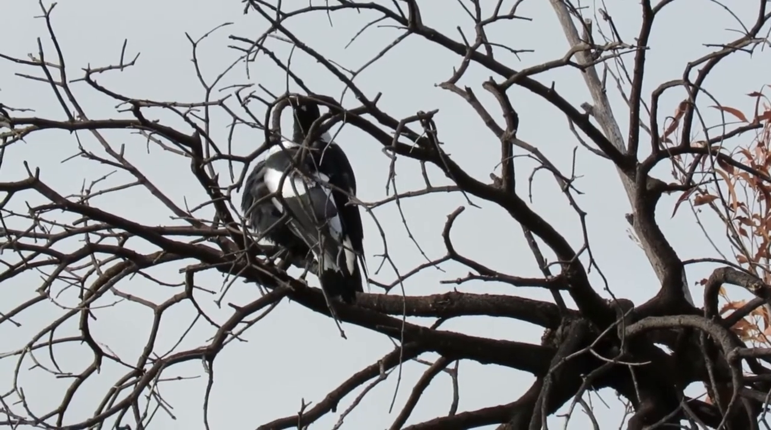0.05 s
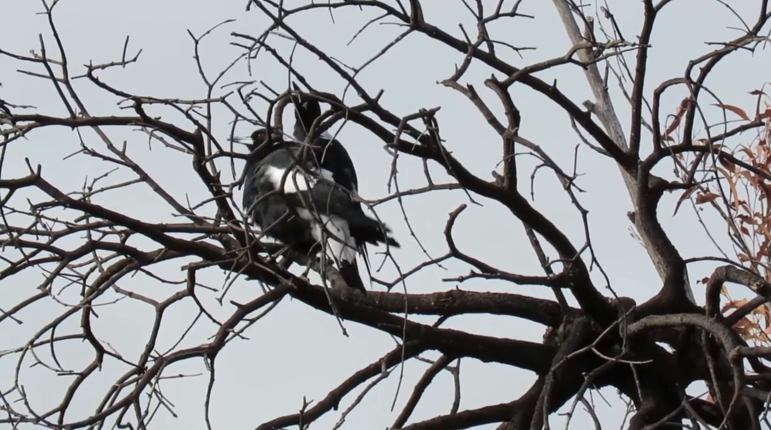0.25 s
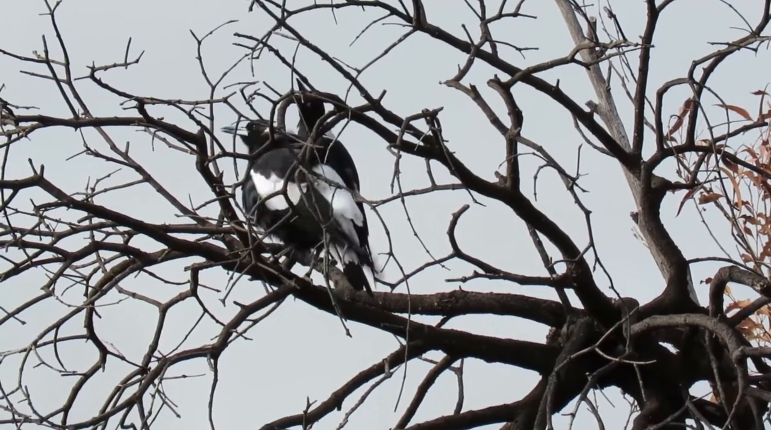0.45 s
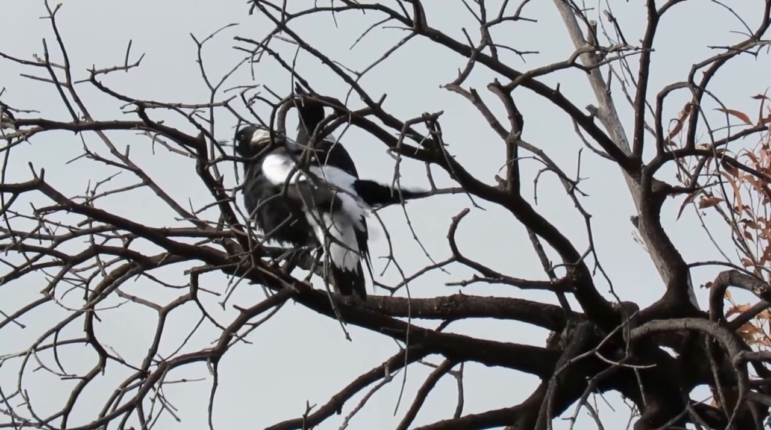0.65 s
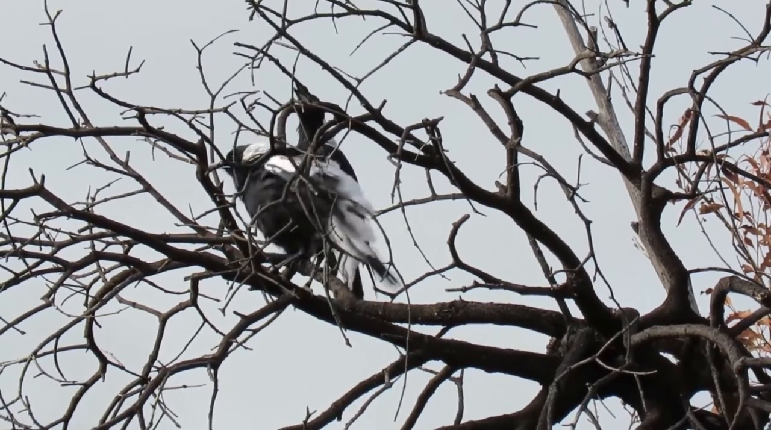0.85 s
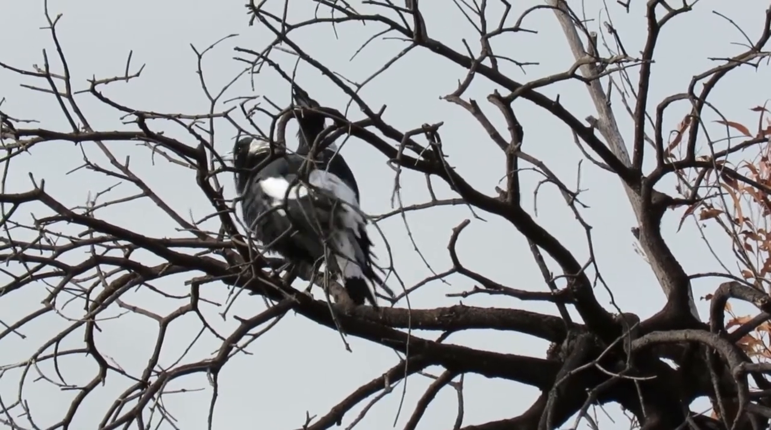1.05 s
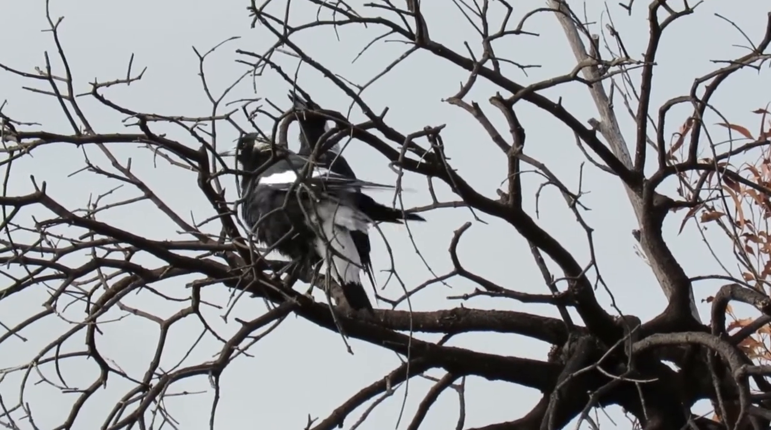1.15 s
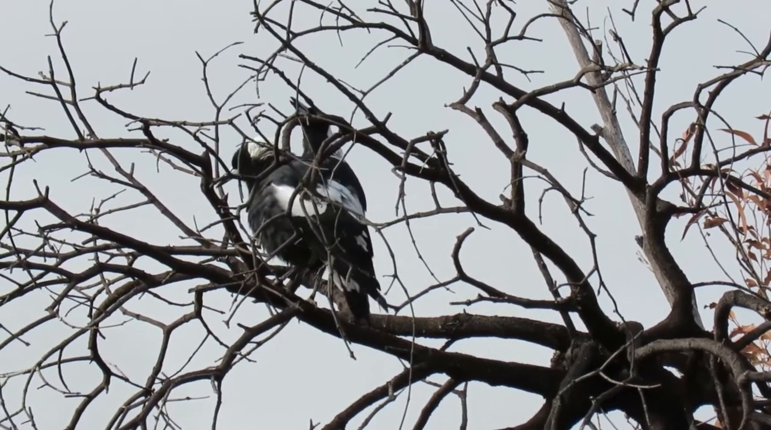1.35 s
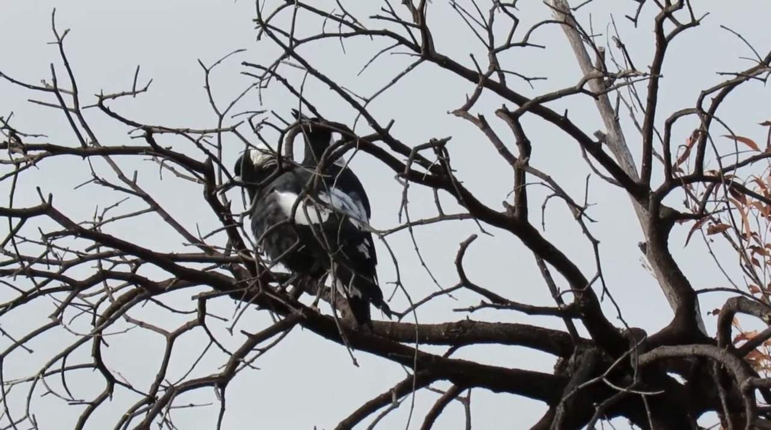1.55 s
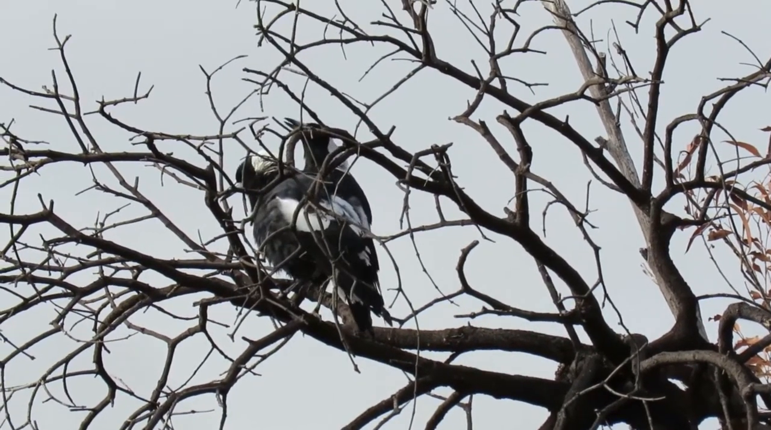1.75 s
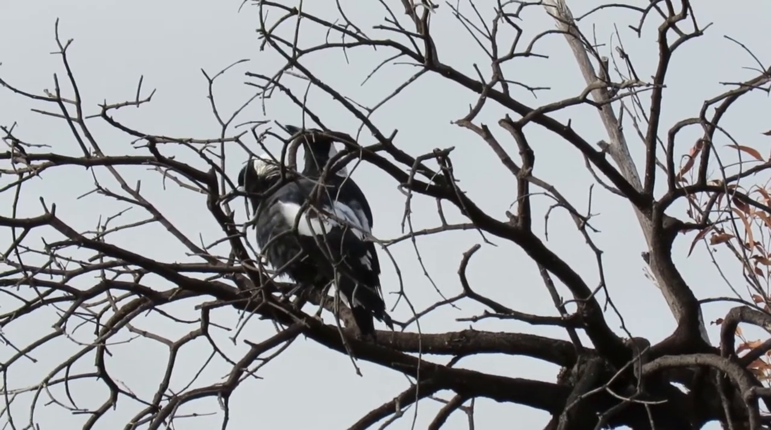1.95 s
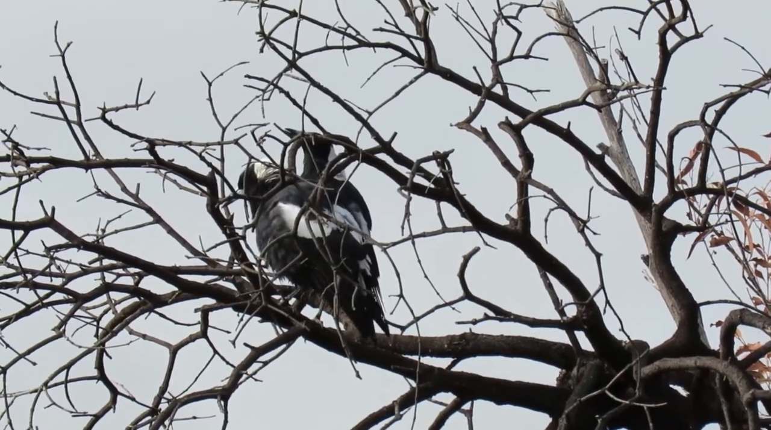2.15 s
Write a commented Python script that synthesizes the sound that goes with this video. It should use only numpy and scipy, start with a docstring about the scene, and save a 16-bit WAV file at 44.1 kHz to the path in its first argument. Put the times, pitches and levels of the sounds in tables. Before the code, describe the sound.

Close magpie call: piercing downward cry breaking reedy, mellow fluting and purring over quiet outdoor hush

```python
"""A far bird's fluttering notes sound now and then under a steady hush; a near magpie opens with soft
notes and rasps. A loud falling call breaks into a short reedy note; a fluted whistle, a low purr and a
closing chuckle follow. The bird is two oscillators, the sides of its syrinx, which beat, chop each other
and make mixed tones. The air is shaped noise, the wind shaped noise in gusts; delayed copies and a
decaying noise tail give echoes."""
import sys
import numpy as np
from scipy import signal
from scipy.fft import rfft, irfft
from scipy.io import wavfile
from scipy.ndimage import uniform_filter1d

SR = 44100
rng = np.random.default_rng(int(sys.argv[2]) if len(sys.argv) > 2 else 0)


def to_wav(sig):
    """Store sig (one row per channel, or 1-D mono) as 16-bit WAV at the path in sys.argv[1].

    Samples outside -1..1 are clipped; the rate is SR.
    """
    pcm = np.clip(np.atleast_2d(sig), -1, 1) * 32767
    pcm = np.round(pcm).astype(np.int16)
    wavfile.write(sys.argv[1], SR, pcm.T)  # frames by channels


N = 97020
T = np.arange(N) / SR  # s
SPECTRUM_HZ = np.arange(N // 2 + 1) * SR / N


def from_db(db):
    """Logarithmic level: decibels to amplitude gain."""
    return 10 ** (np.asarray(db) / 20)


def rms_one(x):
    """Power normalization: scale to rms 1."""
    return x / np.sqrt(np.mean(x ** 2) + 1e-20)


def in_time(rows):
    """Linear interpolation: each column of a curve at every sample."""
    s, *columns = np.transpose(rows)
    return [np.interp(T, s, column) for column in columns]


def at_hz(points, hz):
    """Logarithmic frequency axis: read a spectrum between its points."""
    f, value = np.transpose(points)
    return np.interp(np.log(hz + 1e-9), np.log(f), value)


def drift(hz):
    """Low-pass filtered chance: random variation slower than about hz, with rms 1."""
    lowpass = 1 / (1 + ((SPECTRUM_HZ / hz) ** 2) ** 2)
    return rms_one(irfft(rfft(rng.standard_normal(N)) * lowpass, N))


def noise(spectrum):
    """Spectral shaping: white noise given a colour, rms 1."""
    gain = from_db(at_hz(spectrum, SPECTRUM_HZ))
    return rms_one(irfft(rfft(rng.standard_normal(N)) * gain, N))


def coloured(x, spectrum):
    """Linear filtering: weight a sound by a spectrum."""
    f = np.arange(N + 1) * SR / (2 * N)  # padded to twice the length
    return irfft(rfft(x, 2 * N) * from_db(at_hz(spectrum, f)))[:N]


def gate(rows, edge_s=0.004):
    """Smooth onset and offset: half open at the first and last points of a curve."""
    inside_s = np.minimum(T - rows[0][0], rows[-1][0] - T)
    return np.sin(np.pi / 2 * np.clip(inside_s / edge_s + .5, 0, 1)) ** 2


def swell(start, length, shape):
    """Amplitude envelope: a rounded rise and fall, its corners smoothed."""
    u = np.clip((T - start) / length, 0, 1)
    return uniform_filter1d(np.sin(np.pi * u).clip(0) ** shape, size=128)


def phase_of(hz, jitter, jitter_hz=150):
    """Frequency modulation: running phase of an oscillator with random pitch jitter."""
    return 2 * np.pi * np.cumsum(hz * (1 + jitter * drift(jitter_hz))) / SR


def glide(start, length, from_hz, to_hz):
    """Pitch glide: frequency moves linearly from one value to another."""
    return np.interp(T, [start, start + length], [from_hz, to_hz])


SHIMMER_DB = 0.56


def loudness(db):
    """Amplitude shimmer: height of a sine of this rms level, varied at random."""
    return np.sqrt(2) * from_db(db + SHIMMER_DB * drift(63))


def rough_sine(phase, rough, width_hz):
    """Narrow-band modulation: a tone with a skirt of noise around it."""
    return np.sin(phase) * (1 + rough * drift(width_hz)) + np.cos(phase) * rough * drift(width_hz)


MIX_ROUGH = 0.87


def mixed_tones(mixes, high_phase, low_phase):
    """Intermodulation: tones at sums and differences of both syrinx sides' rounded multiples."""
    total = 0
    for m, n, db in mixes:
        phase = round(m) * high_phase + round(n) * low_phase
        total = total + from_db(db) * rough_sine(phase, MIX_ROUGH, width_hz=180)
    return total


def delayed(x, s):
    """Propagation delay: the sound s seconds later."""
    return np.interp(T - s, T, x, left=0, right=0)


# colour of the outdoor air: frequency_hz, level_db
AIR_COLOUR = [(15, -49.5), (25, -16.5), (200, -4.5), (276, 4), (496, -7.5), (567, 0), (702, -9), (781, -1),
              (1400, -13.5), (1600, -13.5), (2150, -19.5), (3120, -20), (7540, -31), (11500, -39.5),
              (14700, -45)]
# left-right likeness of the air: frequency_hz, correlation (-1 to 1)
AIR_LIKENESS = [(30, 1), (70, -0.078), (130, -0.33), (280, -0.79), (550, -0.32), (1000, 0.34),
                (3000, -0.26), (12000, 0.084)]
AIR_GAIN_DB = -51.5


def air():
    """Interchannel correlation: steady hush, widest in the low middle, from mid and side noise."""
    alike = np.clip(at_hz(AIR_LIKENESS, SPECTRUM_HZ), -.95, .95)
    mid = irfft(rfft(noise(AIR_COLOUR)) * np.sqrt(1 + alike), N)
    side = irfft(rfft(noise(AIR_COLOUR)) * np.sqrt(1 - alike), N)
    return from_db(AIR_GAIN_DB) * np.array([mid + side, mid - side])


NOTE_ROUGH, NOTE_SHAPE, NOTE_SECOND_DB = 0.52, .55, -40  # second harmonic against the fundamental


def fluttering_notes(rows, jitter):
    """Amplitude modulation: notes swell, glide and flutter, rougher as the flutter deepens."""
    out = np.zeros(N)
    for start, length, from_hz, to_hz, db, flutter_hz, depth in rows:
        phase = phase_of(glide(start, length, from_hz, to_hz), jitter)
        middle = start + length / 2
        flutter = 1 + depth * np.cos(2 * np.pi * flutter_hz * (T - middle))
        fundamental = rough_sine(phase, NOTE_ROUGH * depth, width_hz=160)
        tone = fundamental + from_db(NOTE_SECOND_DB) * np.sin(2 * phase)
        out += np.sqrt(2) * from_db(db) * swell(start, length, NOTE_SHAPE) * flutter * tone
    return out


# the far bird's notes, level before swell and flutter:
# start_s, length_s, start_hz, end_hz, level_db, flutter_hz, flutter_depth (ratio)
FAR_NOTES = [(-.02, 0.055, 761, 770, -51, 40, 0.36), (.255, 0.072, 862, 862, -42.5, 60.2, .1),
             (.335, 0.022, 1058, 940, -41.5, 80, .2), (.55, 0.07, 817, 753, -51.5, 60, .3),
             (.662, 0.031, 957, 1000, -52, 60, 0.4), (.815, 0.15, 874, 820, -46, 105.2, 0.37),
             (1.32, 0.15, 574, 550, -55.5, 40.6, 0.19), (1.87, 0.33, 405, 383.7, -58.5, 31.2, 0.83)]


def far_bird():
    """Amplitude modulation: the far bird's fluttering tones."""
    return fluttering_notes(FAR_NOTES, jitter=0.021)


# the near bird's short notes and closing chuckle, with a faint ring of the whistle at 1.09 s,
# level before swell and flutter:
# start_s, length_s, start_hz, end_hz, level_db, flutter_hz, flutter_depth (ratio)
NEAR_NOTES = [(.062, 0.02, 1740, 1770, -54, 90, 0.22), (.085, 0.18, 1387, 1320, -47, 91, 0.31),
              (.115, 0.0085, 1404, 1350, -44.5, 90, 0.12), (.125, 0.026, 1690, 1770, -50.5, 91, 0.37),
              (.177, 0.077, 1501, 1548, -35.5, 83.3, 0.26), (.693, 0.011, 1510, 1574, -37, 90, 0.13),
              (1.09, 0.13, 1295, 1335, -53, 103, 0.15), (1.16, 0.034, 1694, 1585, -50, 89.4, .2),
              (1.378, 0.019, 950, 975, -46, 90, 0.18), (1.434, 0.055, 750, 735, -49.5, 75, 0.35),
              (1.503, 0.0473, 726, 704, -39.5, 69.7, 0.55), (1.852, .022, 789, 624, -43.5, 85.5, 0.88),
              (1.88, .024, 1155, 1126, -45.5, 93, 0.26), (1.902, 0.022, 1297, 1315, -39.5, 90, .1),
              (1.921, 0.022, 1130, 1120, -46, 90, .2), (1.948, 0.051, 728, 719, -35.5, 87, 0.26),
              (1.988, 0.052, 730, 719, -47, 85, 0.27), (2.04, 0.083, 759, 659, -49.5, 68, 1.23),
              (2.105, 0.083, 958.3, 980, -42.5, 97, 0.36), (2.119, 0.042, 961.6, 996, -38.5, 98, 0.61),
              (2.175, 0.073, 734, 678, -47.5, 81, 0.53)]


def short_notes():
    """Amplitude modulation: the near bird's fluttering tones and a faint ring of its whistle."""
    return fluttering_notes(NEAR_NOTES, jitter=0.0129)


# discrete echoes from the ground and trees: delay_s, level_db, pan_db (left minus right)
ECHO_PATHS = [(0.043, -25.5, -8), (.085, -24.5, 3), (.118, -30.5, -1)]


def echoes(dull):
    """Specular reflection: delayed, weaker copies, each to its own side."""
    total = np.zeros((2, N))
    for delay_s, db, pan in ECHO_PATHS:
        total += from_db([[db + pan / 2], [db - pan / 2]]) * delayed(dull, delay_s)
    return total


TAIL_T60_S, TAIL_BUILD_S, TAIL_WIDTH = 1.6, 0.04, 0.32


def tail(x):
    """Diffuse reverberation: scatter from the trees as decaying noise, partly different in each ear."""
    decay = from_db(-60 * T / TAIL_T60_S) * (1 - np.exp(-T / TAIL_BUILD_S))
    mid, side = rng.standard_normal((2, N)) * decay / np.sqrt(np.sum(decay ** 2))
    left = signal.fftconvolve(x, mid + TAIL_WIDTH * side)[:N]
    right = signal.fftconvolve(x, mid - TAIL_WIDTH * side)[:N]
    return np.array([left, right])


RASP_JITTER, RASP_HISS, CHOP_JITTER, RASP_ROUGH = .017, .25, .07, .4
# rasps, and the bright onset of the falling call, level before the swell: start_s, length_s, start_hz,
# end_hz, second_side_hz, second_side_share (ratio), level_db, tilt_db_per_octave
RASP_BURSTS = [(0.129, 0.061, 1800, 1453, 230, 0.42, -55.5, -21),
               (0.163, 0.044, 1480, 1597, 81.8, .7, -55, -17),
               (0.178, 0.091, 1502, 1496, 83.1, .6, -55, -7.5), (.253, .011, 1830, 1880, 400, .2, -52, -15),
               (0.233, 0.1, 1875, 1910, 410, 1.1, -63, -1), (0.407, 0.12, 1782, 1640, 1127, 2.5, -59, -0.5),
               (0.708, 0.04, 1609, 1542, 377, 2, -53.5, -6)]
# colour of these bursts before the tilt: frequency_hz, level_db
RASP_COLOUR = [(1200, -28), (2200, -9.5), (3000, -7), (3700, -8), (4440, -4.5), (5400, -22.5), (6200, -8),
               (7360, -4), (8660, -18.5), (11400, -10.5), (14000, -35.5)]


def rasps():
    """Cross-modulation: unsteady overtones, chopped at a second frequency and mixed with hiss."""
    out = np.zeros(N)
    for start, length, from_hz, to_hz, second_hz, share, db, tilt_db in RASP_BURSTS:
        phase = phase_of(glide(start, length, from_hz, to_hz), RASP_JITTER, jitter_hz=450)
        chop = 1 + share * np.cos(phase_of(second_hz, CHOP_JITTER, jitter_hz=313))
        overtones = sum(rough_sine(k * phase, RASP_ROUGH, width_hz=390) for k in range(2, 9))
        buzz = rms_one(chop * overtones) + RASP_HISS * rng.standard_normal(N)
        colour = [(hz, level + tilt_db * np.log2(hz / from_hz)) for hz, level in RASP_COLOUR]
        out += from_db(db) * swell(start, length, shape=0.8) * rms_one(coloured(buzz, colour))
    return out


CALL_JITTER, LOW_SIDE_JITTER = 0.002, .025
HARDENS_S, HARDEN_TAKES_S = 0.417, 0.022  # middle and length of the change
OVERTONES_DB, OVERTONE_FLICKER_DB, ROUGH_PER_HARMONIC = .8, 2, .06
# pitch of the falling call: time_s, pitch_hz
FALL_PITCH = [(.255, 1851.5), (.266, 1951), (.278, 1980), (.3, 1947), (.33, 1865.5), (.375, 1777),
              (.42, 1726), (.48, 1658.5), (.54, 1582), (.558, 1594), (.575, 1537)]
# level of its fundamental: time_s, level_db
FALL_LEVEL = [(.254, -40.5), (.272, -28), (.3, -27.5), (.318, -30), (.338, -27), (.403, -27.5), (.414, -25),
              (.438, -23.5), (.449, -27.5), (.475, -23.5), (.489, -30), (.502, -22.5), (.511, -26.5),
              (.525, -21), (.546, -21.5), (.56, -21.5), (.568, -28), (.576, -38)]
# overtones against the fundamental before the voice hardens, less a common gain: frequency_hz, level_db
SOFT_OVERTONES = [(3550, -33.5), (3750, -44.5), (3950, -33), (5300, -41), (5600, -41), (5850, -29.5),
                  (7050, -25), (7500, -34), (7900, -39), (8700, -62.5), (9250, -36), (9750, -43),
                  (10400, -42.5), (11600, -40.5), (12500, -65.5), (14000, -58.5)]
# the same after it hardens: frequency_hz, level_db
HARD_OVERTONES = [(3170, -44.5), (3400, -61), (4760, -24.5), (4950, -27.5), (5250, -48), (6350, -33.5),
                  (6900, -47.5), (7950, -39), (8500, -46), (9500, -43.5), (10000, -44), (10900, -65.5),
                  (11500, -43.5), (12100, -49), (12700, -71), (14700, -58)]
# low side of the syrinx, joining as the call hardens: time_s, pitch_hz, level_db
LOW_SIDE = [(.408, 829.5, -67.5), (.425, 864, -62), (.45, 1005, -65.5), (.475, 1155, -55),
            (.505, 1142, -59), (.525, 1126, -57.5), (.537, 1000, -68)]
# tones that both sides make together: high_side_multiple, low_side_multiple, relative level_db
FALL_MIXES = [(0, 1, 3), (2, 1, -5.5), (5, -1, -5.5), (4, 1, -12.5), (7, -1, -21)]


def falling_call():
    """Resonance: overtones sweep the beak's colours as the pitch falls; the low side grates late on."""
    hz, = in_time(FALL_PITCH)
    db, = in_time(FALL_LEVEL)
    phase = phase_of(hz, CALL_JITTER)
    late = np.clip((T - HARDENS_S) / HARDEN_TAKES_S + .5, 0, 1)
    tone = np.sin(phase)
    for k in range(2, 10):
        soft_db, hard_db = at_hz(SOFT_OVERTONES, k * hz), at_hz(HARD_OVERTONES, k * hz)
        level_db = (1 - late) * soft_db + late * hard_db
        level_db = OVERTONES_DB + level_db + OVERTONE_FLICKER_DB * drift(40)
        tone += from_db(level_db) * rough_sine(k * phase, k * ROUGH_PER_HARMONIC, width_hz=220)
    low_hz, low_db = in_time(LOW_SIDE)
    low_phase = phase_of(low_hz, LOW_SIDE_JITTER)
    grating = loudness(low_db) * gate(LOW_SIDE) * mixed_tones(FALL_MIXES, phase, low_phase)
    return loudness(db) * gate(FALL_LEVEL) * tone + grating


# gusts on the microphone: time_s, level_db
WIND_GUSTS = [(0, -83), (.29, -71), (.36, -65), (.43, -75.5), (1.0, -74.5), (1.11, -56), (1.17, -57),
              (1.205, -44), (1.26, -57.5), (1.38, -72.5), (1.7, -85), (1.78, -59), (1.9, -56), (2.05, -72)]
# colour of the wind: frequency_hz, level_db
WIND_COLOUR = [(25, -12.5), (50, 6), (90, 4), (150, -2), (250, -6), (500, -34), (2000, -80.5)]


def wind():
    """Turbulent pressure noise: soft low buffets, independent on each side of the microphone."""
    db, = in_time(WIND_GUSTS)
    return from_db(db) * np.array([noise(WIND_COLOUR), noise(WIND_COLOUR)])


JITTER = .004  # pitch unsteadiness of the reedy note, whistle and purr
BREAK_MIX_DB = -59
# low side of the reedy note: time_s, pitch_hz, level_db, overtone_boost_db
REED_CURVE = [(.711, 1259, -41.5, -28.5), (.719, 1234, -36.5, -26), (.731, 1198, -45.5, -18.5),
              (.74, 1136, -41.5, -7.5), (.752, 1126, -40.5, -2), (.766, 1125, -36.5, 1),
              (.775, 1132, -36.5, -2.5), (.781, 1145, -33.5, -17.5), (.794, 1113, -35, -1.5),
              (.805, 1093, -44.5, -11)]
# its overtones before the boost: multiple (ratio), level_db
REED_PARTIALS = [(2, -30), (3, -30), (4, -6), (6, -18.5), (8, -39), (10, -29)]
# high side flaring up briefly, then dying away, as the voice breaks: time_s, pitch_hz, level_db
BREAK_CURVE = [(.711, 1620, -53.5), (.718, 1610, -44.5), (.729, 1574, -31), (.738, 1530, -37),
               (.746, 1530, -47), (.755, 1570, -52.5)]
# tones made with the low side, multiples rounded when played:
# high_side_multiple, low_side_multiple, relative level_db
BREAK_TONES = [(0, 2, -10), (0, 0.5, -8.5), (1.5, 2.5, -10), (0.5, 2.5, -9.5), (3, 1, -3.5),
               (5.5, -0.5, -17.5), (2, 3, -13.5), (5, 0, -15)]


def reedy_note():
    """Intermodulation: the high side flares and dies, grating on a low side with strong even overtones."""
    hz, db, boost_db = in_time(REED_CURVE)
    high_hz, high_db = in_time(BREAK_CURVE)
    phase, high_phase = phase_of(hz, JITTER), phase_of(high_hz, JITTER)
    overtones = sum(from_db(level + boost_db) * np.sin(k * phase) for k, level in REED_PARTIALS)
    low_side = loudness(db) * gate(REED_CURVE) * (np.sin(phase) + overtones)
    high_side = loudness(high_db) * np.sin(high_phase)
    grating = loudness(BREAK_MIX_DB) * mixed_tones(BREAK_TONES, high_phase, phase)
    return low_side + gate(BREAK_CURVE) * (high_side + grating)


BEAT_JITTER = .025


def warble(curve, falloff, rough):
    """Sideband modulation: the syrinx's slow side pulses a whistle almost steadily, adding side tones."""
    hz, db, upper_db, lower_db, beat_hz = in_time(curve)
    phase = phase_of(hz, JITTER)
    beat = phase_of(beat_hz * gate(curve), BEAT_JITTER, jitter_hz=40)
    sides = 0
    for k in range(3):
        upper = from_db(upper_db) * np.sin(phase + (k + 1) * beat)
        lower = from_db(lower_db) * rough_sine(phase - (k + 1) * beat, 2 * rough, width_hz=27)
        sides = sides + falloff ** (k * k) * (upper + (-1) ** k * lower)
    return loudness(db) * gate(curve) * (rough_sine(phase, rough, width_hz=120) + sides)


# the fluted whistle, side tones against the main tone:
# time_s, pitch_hz, level_db, upper_side_db, lower_side_db, beat_hz
FLUTE_CURVE = [(.81, 1237, -40.5, -10, -7.5, 109), (.84, 1264, -41.5, -13, -9, 110),
               (.865, 1237, -35.5, -11, -15, 106), (.92, 1260, -34, -7.5, -27, 104.3),
               (.955, 1235, -33, -12.5, -22.5, 99.7), (1.02, 1229, -35.5, -2, -26.5, 104.5),
               (1.068, 1153, -46, 11, -5.5, 104.8), (1.1, 1118, -42, 5, -15, 105.3),
               (1.13, 1095, -35, -27, -17, 105), (1.18, 1052, -33.5, -16.5, -17, 108.4),
               (1.235, 1037, -34.5, -13.5, -13.5, 112.7), (1.265, 1022, -33.5, -16.5, -23, 87.5),
               (1.288, 1040, -32, -13, -23, 60.4), (1.301, 1045, -38.5, -13.5, -22, 60),
               (1.31, 1044, -39.5, -9.5, -18, 60)]


def fluted_whistle():
    """Sideband modulation: outer side tones fall off fast, so the whistle stays clear."""
    return warble(FLUTE_CURVE, falloff=0.11, rough=0.097)


# the low purr, side tones against the main tone:
# time_s, pitch_hz, level_db, upper_side_db, lower_side_db, beat_hz
PURR_CURVE = [(1.585, 989, -57.5, -8, -3, 76.7), (1.635, 996, -42, -21.5, -6, 78.2),
              (1.69, 980, -40.5, -26, -5, 72), (1.725, 988, -36, -30, -7, 74.8),
              (1.785, 984, -35.5, -24, -6.5, 73.3), (1.811, 989.6, -47.5, -18.5, 4, 79.8),
              (1.822, 990, -35.5, -24, -13, 90.3), (1.845, 938, -42, -26, -7, 80),
              (1.872, 936, -48.5, -5, 1, 78.6)]


def low_purr():
    """Sideband modulation: stronger outer side tones and a rougher voice make a purr."""
    return warble(PURR_CURVE, falloff=0.66, rough=0.18)


BIRD_PAN_DB = .25  # left raised and right lowered by this
BIRD_LAG_S = 1.9e-5  # the right side of the microphone is a little further away
TAIL_DB, FAR_TAIL_DB = -21.5, -14
# colour of the near bird's echoes and tail: frequency_hz, level_db
DULL_COLOUR = [(700, 4), (1050, 1.5), (1550, -1), (2000, 0.5), (4700, 1.5), (6500, -0.5), (12000, -13)]


def scene():
    """Superposition: near bird with dull echoes, far bird with its tail, air and wind."""
    far = far_bird()
    bird = short_notes() + rasps() + falling_call() + reedy_note() + fluted_whistle() + low_purr()
    left = from_db(BIRD_PAN_DB) * bird
    right = from_db(-BIRD_PAN_DB) * delayed(bird, BIRD_LAG_S)
    dull = coloured(bird, DULL_COLOUR)
    near = np.array([left, right]) + echoes(dull) + from_db(TAIL_DB) * tail(dull)
    distant = far + from_db(FAR_TAIL_DB) * tail(far)
    return near + distant + air() + wind()


CUTOFF_HZ = 14650


def record(dry):
    """Low-pass filtering: an elliptic filter cuts the top steeply."""
    lowpass = signal.ellip(10, .1, 80, CUTOFF_HZ, fs=SR, output="sos")  # ripple and stopband in dB
    return signal.sosfilt(lowpass, dry)


dry = scene()
out = record(dry)
to_wav(out)
```